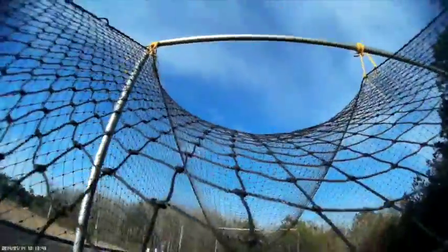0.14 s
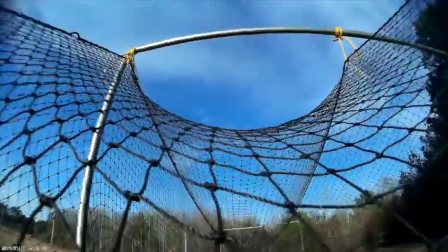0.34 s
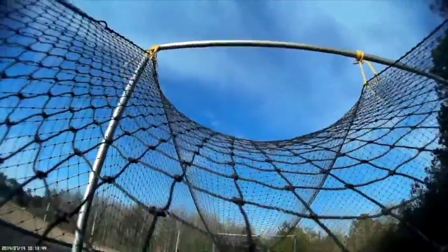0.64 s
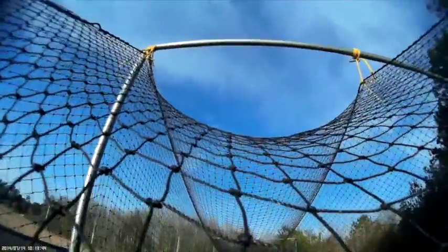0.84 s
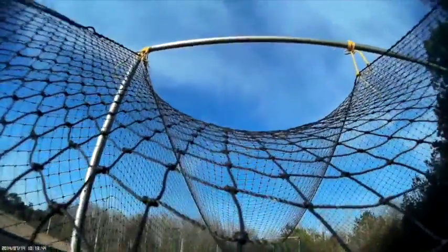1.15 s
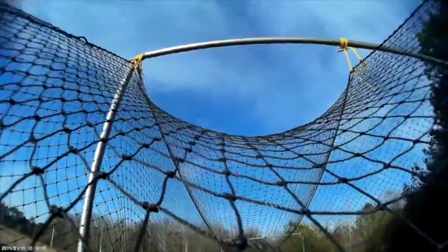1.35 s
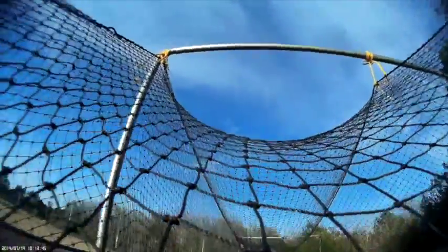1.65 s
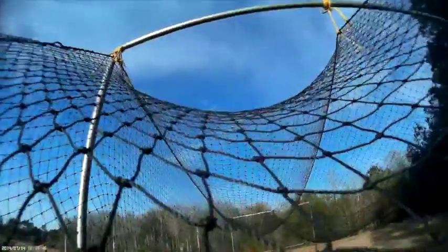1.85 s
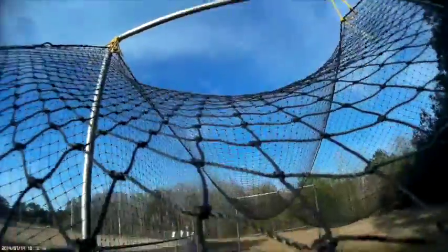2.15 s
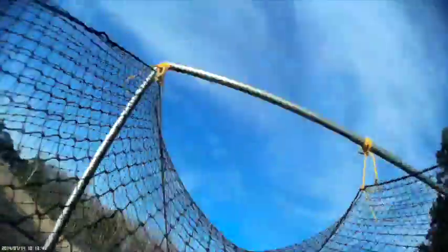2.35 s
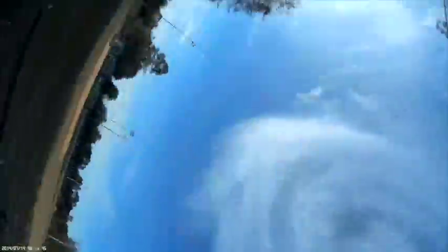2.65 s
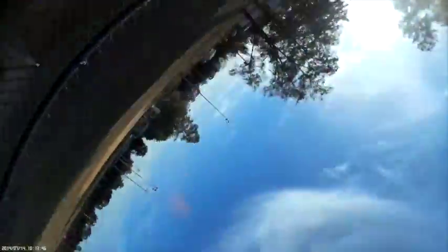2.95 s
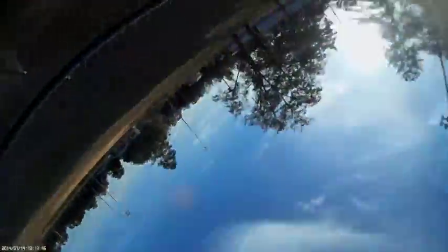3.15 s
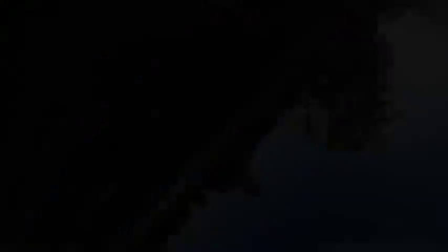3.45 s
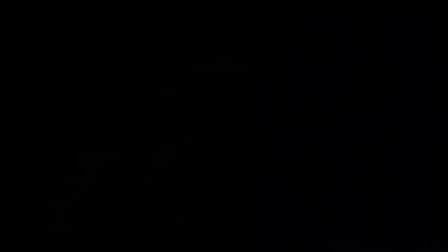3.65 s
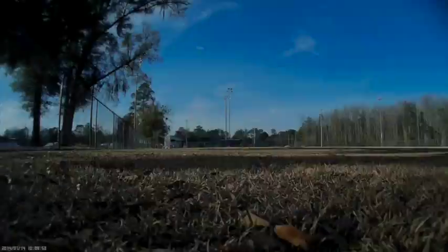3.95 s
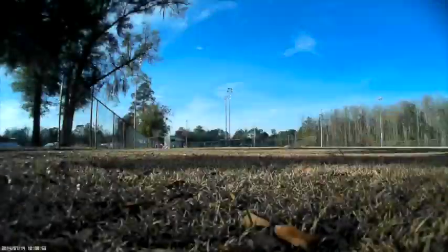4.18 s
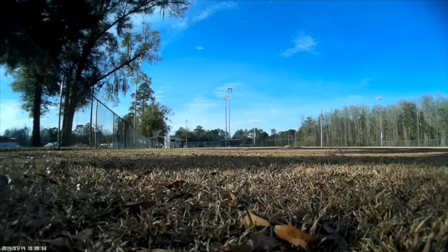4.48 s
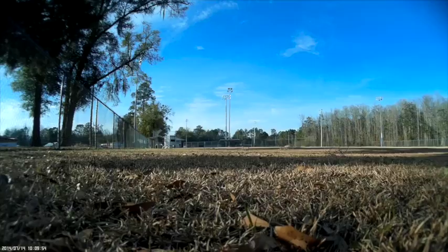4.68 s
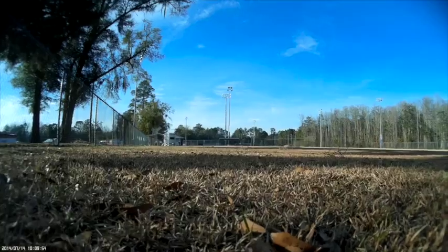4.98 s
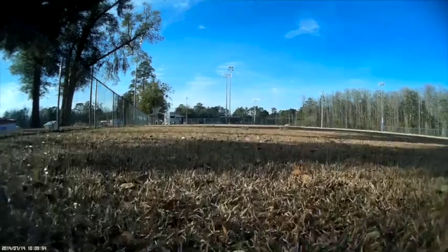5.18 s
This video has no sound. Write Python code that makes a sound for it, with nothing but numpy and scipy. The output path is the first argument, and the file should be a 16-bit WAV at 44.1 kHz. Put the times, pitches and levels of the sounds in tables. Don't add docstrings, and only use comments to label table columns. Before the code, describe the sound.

Faint rubbing and taps, rough rattling bumps on a small plastic body, quiet field with far engine, then four rotors kick and rise into a buzzing roar.

```python
import sys
import numpy as np
from scipy import signal
from scipy.fft import rfft, irfft, next_fast_len
from scipy.io import wavfile
from scipy.ndimage import uniform_filter1d, map_coordinates

SR = 44100
rng = np.random.default_rng(int(sys.argv[2]) if len(sys.argv) > 2 else 0)


def pcm_store(signal):
    levels = np.round(np.clip(np.atleast_2d(signal), -1, 1) * 32767)
    wavfile.write(sys.argv[1], SR, levels.astype(np.int16).T)


def volts_from_db(level):
    exponent = np.asarray(level, float) / 20
    return 10 ** exponent


N = 234548
T = np.arange(N) / SR

# f/Hz, width/Hz, level/dB
LID = [(1530, 70, 0), (1800, 300, -9), (2450, 250, -17)]
# f/Hz, width/Hz, level/dB
BRIGHT = [(3160, 1130, -2.5), (4045, 390, 4), (4534, 294, 3.5), (5930, 550, -0.5), (7650, 560, -9),
          (9590, 580, -10.5), (11700, 410, -20)]
# t/s, exhaust level/dB, road rumble level/dB
IDLE = [
    (3.2, -55.5, -65.5),
    (3.856, -29.5, -47),
    (4.46, -29, -45),
    (4.56, -34.5, -52.5),
]


def unit(x):
    return x / np.sqrt(np.mean(x ** 2) + 1e-20)


def mix(*levels_db):
    return np.sqrt(sum(volts_from_db(2 * np.asarray(db)) for db in levels_db))


def curves(rows, before=None):
    s, *cols = np.transpose(rows)
    return [np.interp(T, s, c, left=before) for c in cols]


def wobble(rate, size=N):
    return map_coordinates(rng.standard_normal(size=8000), [2 + np.arange(size) * rate / SR], order=2)


def filtered(x, response):
    m = next_fast_len(N + SR // 4)
    return irfft(rfft(x, m) * response(np.fft.rfftfreq(m, 1 / SR)), m)[:N]


def modes(table, f):
    total = 0
    for k, (centre, width, db) in enumerate(table):
        damping = 1j * f * width
        total = total + (-1) ** k * volts_from_db(db) * damping / (centre * centre - f * f + damping)
    return total


def rung(x, table):
    power = np.mean(abs(modes(table, np.linspace(1, SR / 2, 8192))) ** 2)
    return filtered(x, lambda f: modes(table, f) / np.sqrt(power))


def rush(spectrum):
    hz, db = np.transpose(spectrum)
    return unit(filtered(rng.standard_normal(N), lambda f: volts_from_db(np.interp(np.log(f + 1), np.log(hz), db))))


def rubbing():
    # t/s, level/dB, slip/dB
    rub = [(0, -87, 10), (.3, -69, 6.5), (.45, -63, -3), (.7, -67, -8.5), (.9, -58.5, -0.5),
           (1.1, -62.5, 1.5), (1.694, -59.5, -0.5), (1.7, -45.5, 2), (1.91, -40, -1), (2.02, -33.5, -3),
           (2.15, -40.5, 0.8), (2.35, -35, -4.5), (2.46, -48.5, 0), (2.6, -43, -0.5), (2.72, -37.5, 1.5),
           (2.86, -33, -6), (3.01, -32, -5.5), (3.12, -39.5, -9), (3.34, -54.5, 0), (3.5, -89, -5.5)]
    press_db, slip_db = curves(rub)
    part_db = np.where(T < 1.697, np.c_[[1, -4.5, -7.5]], np.c_[[0.5, -6, -12.5]])
    rub_db = press_db + part_db + np.outer([0, .4, 1], slip_db)
    grass_edge = np.minimum(T - 3.47, 3.98 - T) / 0.064
    grass_db = np.c_[[-57.5, -56.5, -66]] + 20 * np.minimum(grass_edge, 0)
    breeze_db = np.c_[[-56.5, -71.5, -90]] + curves(IDLE, before=-94.5)[1] - IDLE[-1][2]

    clumps = 2 * wobble(30) + 3.5 * wobble(100)
    smooth = np.clip(-1 - .15 * slip_db, .3, 1)
    drive = []
    for gain in mix(rub_db, grass_db):
        grit_db = smooth * (0.85 * clumps + 1.7 * wobble(40)) + 3.1 * wobble(500)
        drive.append(gain * volts_from_db(-1.5) * unit(volts_from_db(grit_db) * rng.standard_normal(N)))
    return np.array(drive) + volts_from_db(breeze_db) * rng.standard_normal((3, N))


def knocks():
    # t/s, force level/dB, place (-1 shell to 1 lid), hardness (0-1), length/ms
    sway = [(.175, -45.5, -0.42, 0.42, 26.5), (0.236, -49.5, -0.3, 0.49, 20),
            (0.346, -38.5, 0.59, 1.04, 15), (.38, -41.5, 0.27, 0.8, 23.4), (.462, -46, -1, 0.1, 22),
            (.496, -54, 0.94, 1, 12), (.514, -34, -0.51, 0.77, 19.8), (0.549, -47, -0.65, 0.3, 13.9),
            (.711, -53, 0.2, 0.9, 12.7), (.868, -47, -1, 0.5, 59), (1.48, -56.5, -0.73, 1.3, 12)]
    tug = [(1.703, -27.5, -0.13, 0.73, 8.5), (1.716, -28.5, -0.38, 0.3, 51),
           (1.761, -23, -0.37, 0.63, 13.6), (1.806, -24, 0.24, 0.99, 7.3), (1.839, -31.5, 1.3, 0.77, 32.6),
           (1.856, -28.5, 0.24, 0.51, 14), (1.904, -32.5, 0.88, 0.64, 11.3), (1.956, -41.5, 0.4, 1.28, 5.3),
           (1.999, -19, 0.047, 0.44, 10.7), (2.025, -31, -1.3, 0.57, 16), (2.073, -36, 0.029, 1.05, 16),
           (2.096, -37, 0.14, 0.84, 29.5), (2.174, -36.5, 1.2, 0.68, 11.4), (2.202, -33, 1.3, 0.21, 3.7),
           (2.216, -39, 0.83, 1.16, 13), (2.258, -33.5, -0.067, 0.67, 27), (2.308, -34.5, 0.34, .8, 6),
           (2.337, -31, 0.1, 0.46, 9.8), (2.35, -23, -0.06, 0.49, 14), (2.406, -37.5, 0.74, 1.17, 5.1),
           (2.425, -36, 0.66, 1.32, 4.9), (2.444, -35.5, 0.13, 0.88, 5.6), (2.489, -29, -0.21, 0.6, 22),
           (2.523, -40, -0.1, 0.14, 18)]
    fall = [(2.535, -46, .3, 1.05, 4), (2.552, -30.5, 0.57, 0.78, 11.6), (2.566, -9.5, 0.47, 1.136, 3.23),
            (2.581, -34, -0.015, 0.9, 2.7), (2.633, -36.5, 0.9, 0.85, 15), (2.647, -37, -0.12, 1.03, 9),
            (2.678, -26, -0.47, 0.22, 25), (2.764, -37, 0.28, 1.22, 14), (2.781, -29, 0.4, 1.03, 13.5),
            (2.822, -30, 0.14, 1.1, 9), (2.803, -18.5, -0.024, 0.78, 43.3), (2.829, -23.5, -0.13, 0.28, 13),
            (2.9, -7.5, 0.34, 0.92, 10), (3.034, -33, 0.29, .1, 29), (3.075, -27.5, 0.3, 0.6, 15.5),
            (3.088, -20, -0.46, 0.29, 10.3), (3.167, -27, 0.36, 0.47, 6.8), (3.184, -39, -0.25, 0.14, 56),
            (3.298, -45.5, -0.022, 0.62, 19)]
    settle = [(3.372, -44.5, .7, 0.13, 11), (3.428, -36.5, -0.39, 0.69, 8.6),
              (3.502, -44.5, -0.06, 1.13, 4.2), (3.522, -42, -0.085, 0.58, 23.4),
              (3.578, -48, 0.3, 1.18, 4.4), (3.605, -39, -0.14, 1.08, 6.5), (3.697, -42.5, 0.1, 0.63, 34),
              (3.766, -42.5, 0.3, 0.5, 36), (3.812, -38.5, -0.047, 1.09, 8.5),
              (3.889, -30, 0.21, 1.13, 5.7), (3.929, -56, 0.1, 0.78, 10.6), (3.984, -43, 0.73, 0.69, 21),
              (4.481, -34.5, -0.72, 1.48, 16.4), (4.486, -30, 0.43, 1.33, 13.5)]
    drive = np.zeros((4, N))
    t = T[:SR // 5]
    grit = volts_from_db(np.outer([1.7, 2.5, 5.3, 2.5], wobble(240)) - 4.0)
    for group, group_thud_db in zip((sway, tug, fall, settle), [-14, -14, -13.5, -28]):
        for s, db, place, hard, ms in group:
            shell_db = -20 * max(place, 0)
            lid_db = 20 * min(place, 0)
            bright_db = 30 * (hard - 1)
            thud_db = group_thud_db + 16 * min(hard - 1, 0)
            part_db = db + np.array([shell_db, lid_db, bright_db, thud_db])
            length = max(ms, 2) / 1000
            rise = .25 * length
            after = np.maximum(t - rise, 0) / length
            decay = volts_from_db(-np.outer([9.8, 16.3, 27.0, 5.3], after))
            shape = np.minimum(t / rise, 1) ** 2 * decay
            at = round((s - rise - .0015) * SR)
            span = slice(at, at + len(t))
            ticks = grit[:, span] ** np.clip(length / 0.013 - .5, 0, 1)
            level = volts_from_db(part_db + [2.1, 1.6, 0.2, 2.3])[:, None]
            drive[:, span] += level * shape * ticks * rng.standard_normal((4, len(t)))
    return drive


def case():
    # f/Hz, width/Hz, level/dB
    thud = [(111, 84, 0.5), (226, 36, -1), (301, 39, 2.5)]
    # f/Hz, width/Hz, level/dB
    shell = [(318.6, 20, -9), (568, 137, -12.5), (831, 82.4, -0.5), (1306, 96, -6)]
    drive = knocks()
    drive[:3] += rubbing()
    out = sum(rung(x, part) for x, part in zip(drive[1:], (LID, BRIGHT, thud)))
    for k, (hz, width, db) in enumerate(shell):
        gripped = drive[0] * volts_from_db(2 * wobble(14))
        out += (-1) ** k * volts_from_db(db - 3.5) * np.sqrt(width / 70) * rung(gripped, [(hz, width, 0)])
    return out


def blows():
    blow_s = [2.5632, 2.8975, 2.804, 2.676, 2.019, 1.758, 2.018]
    # level/dB, then modes of f/Hz, level/dB, t60/s
    blow_modes = [
        (-13, [(310, -2, 0.035), (520, -8.5, .03), (850, -15, 0.035), (1750, -3, 0.037), (2440, 1, 0.022), (3250, -11, 0.017), (3870, -10, .015), (4800, -8, .014), (5650, -0.5, 0.022), (7700, -6.5, .011)]),
        (-6, [(690, -13.5, 0.071), (835, -7.5, .06), (1500, 1, 0.038), (1880, -6, 0.017), (2470, -19.5, 0.078), (4340, -17, .02), (5200, -14.5, 0.022)]),
        (-18, [(823, -1, .07), (1476, -3.5, .05)]),
        (-26.5, [(832, -2, .08), (1550, -2, 0.054)]),
        (-19.5, [(846, -1.5, 0.06)]),
        (-38, [(2730, -1, .11)]),
        (-41, [(2730, 1, 0.12)]),
    ]
    # f/Hz, level/dB, t60/s
    buckle = [(2735, -14, 0.07), (4470, 4, 0.037), (6060, -10, 0.026)]
    # t/s, level/dB
    pings = [
        (1.758, -38),
        (2.021, -40),
        (3.074, -26),
        (3.088, -21),
        (3.426, -44),
        (3.512, -48),
    ]
    out, t = np.zeros(N), T[:SR // 8]
    rise = 1 - np.exp(-t / 0.00042)
    events = [(s, *blow) for s, blow in zip(blow_s, blow_modes)] + [(*row, buckle) for row in pings]
    for s, db, ring in events:
        tones = 0
        for hz, level_db, t60 in ring:
            tones = tones + volts_from_db(db + level_db - 60 * t / t60) * np.sin(2 * np.pi * hz * t)
        out[round(s * SR):][:len(t)] += rise * tones
    return out


def slides():
    # from t/s, to t/s, level/dB, lid share/dB
    drags = [(0.358, 0.407, -60.5, 10), (1.707, 1.742, -43, -6), (1.837, 1.87, -45.5, 1),
             (1.954, 1.975, -46, -6), (1.788, 1.828, -50, -4), (1.897, 1.943, -49, -4),
             (1.997, 2.025, -40.5, -12), (2.062, 2.106, -45, -1), (2.324, 2.37, -40.5, -1),
             (2.379, 2.431, -42.5, 1), (2.476, 2.493, -52.5, 1.5), (2.625, 2.705, -49, 2),
             (2.756, 2.875, -48, 3), (3.502, 3.53, -58.5, -3.5), (3.606, 3.639, -51.5, 3),
             (3.683, 3.724, -59, -8), (3.75, 3.834, -60.5, -6), (3.925, 3.943, -57, -6.5)]
    gains = np.zeros((2, N))
    for start, end, db, lid_db in drags:
        edge = np.clip(np.minimum(T - start, end - T) / .005, 0, 1)
        gains += np.outer(volts_from_db([db, db + lid_db]), edge)
    grain = gains * volts_from_db(3.5 * wobble(300) - 1.0) * rng.standard_normal((2, N))
    return rung(grain[0], BRIGHT) + rung(grain[1], LID)


def squeaks():
    # t/s, length/s, f/Hz, width/Hz,
    # level/dB
    rings = [(.835, 0.088, 706, 110, -47), (.9, .2, 755, 90, -59), (.84, 0.064, 960, 160, -51),
             (.93, .22, 1190, 220, -59), (.88, .45, 3800, 500, -67), (.86, .15, 5800, 600, -69),
             (1.58, 0.13, 4000, 500, -68), (.35, .15, 1540, 170, -57), (.53, 0.061, 1540, 130, -56),
             (1.758, 0.03, 2730, 12, -52), (2, 0.015, 2730, 30, -45), (2.955, 0.11, 4520, 300, -44),
             (2.958, 0.07, 3100, 200, -53), (2.92, .2, 150, 100, -48), (2.575, .15, 110, 60, -47),
             (1.5, 0.13, 95, 35, -59), (3.075, 0.03, 4400, 400, -37), (3.035, 0.012, 1250, 100, -33),
             (3.505, 0.028, 4500, 150, -51), (1.7, 0.096, 312, 27, -43.5), (3.09, .06, 312, 29, -47),
             (2.57, 0.056, 312, 35, -42),
             (1.762, .04, 1240, 40, -33), (1.81, .025, 790, 50, -34), (1.83, .06, 1510, 40, -38),
              (1.998, .018, 830, 90, -25), (2.255, .03, 1280, 60, -37), (2.35, .022, 1200, 150, -25),
              (2.372, .035, 800, 50, -38), (2.59, .15, 200, 120, -51), (2.2, .012, 2200, 300, -38),
              (2.265, .012, 4400, 150, -46), (2.79, .06, 4500, 300, -38), (2.82, .02, 2300, 500, -33),
              (2.67, .04, 1600, 300, -38), (3.61, .04, 1260, 60, -50), (3.515, .04, 990, 60, -53),
              (4.465, .045, 95, 30, -25), (.56, .07, 1570, 70, -62)]
    # length/s, f/Hz, width/Hz, level/dB
    rattle = [(0.26, 1400, 49.6, -36.5), (0.071, 970, 230, -36), (0.16, 4500, 780, -37),
              (0.15, 5950, 530, -35.5), (0.1, 830, 61, -43.5)]
    out, t = np.zeros(N), T[:SR // 2]
    for s, length, hz, width, db in rings + [(4.478, *row) for row in rattle]:
        shape = np.clip(t / (0.05 * length), 0, 1) * np.clip(1.5 - t / length, 0, 1) ** 2
        envelope = 0.35 + wobble(width, size=len(t)) + 1j * wobble(width, size=len(t))
        band = envelope * np.exp(2j * np.pi * hz * t)
        out[round(s * SR):][:len(t)] += volts_from_db(db) * shape * band.real
    return out


def blades(blade_hz, octaves, turn, half):
    # multiple of the blade rate, level/dB
    harmonics = [(1, 3), (2, -5.5), (3, -10), (4, -15), (5, -16.5), (6, -20.5), (7, -24), (8, -28),
                 (9, -32), (10, -27), (12, -26.5)]
    n = len(turn)
    low_cut_db = -10 * np.log10(1 + (131 / blade_hz) ** 8)
    thrust_db = -14 + 14.5 * octaves + low_cut_db
    tone = np.zeros(n)
    for k, db in harmonics:
        wake_db = 7.5 * (k > 1) * np.minimum(octaves, 0)
        level = volts_from_db(db + wake_db + .4 * (k - 1) * wobble(25, size=n))
        lid = 1 + 1.6 / (1 + ((k * blade_hz - 1500) / 80) ** 2)
        first = np.cos(k * (turn + half + .02 * wobble(30, size=n)))
        second = .81 * 0.71 ** (k - 1) * np.cos(k * (turn - half))
        tone += level * lid * (first + second)
    for k in range(7):
        tone += volts_from_db(-35.0 + 7.2 * wobble(21.5, size=n)) * np.cos((k + .5) * turn)
    return -volts_from_db(thrust_db - 5.0) * tone


def wash(t, octaves, turn, half):
    # level/dB at hover speed, slope/dB per octave, idle level/dB, kick level/dB
    strengths = [(-32, 8.5, -70, -42), (-26.5, 12, -39, -27), (-36, 20.5, -39.5, -37),
                 (-50, 38, -41.5, -17.5)]
    kick_t60 = [0.17, 0.26, 0.17, 0.092]
    # f/Hz, level/dB per Hz
    roar_spectrum = [(250, -39), (400, -16.5), (700, -3), (1000, -0.5), (1500, 1.5), (1800, -3),
                     (2200, -10.5), (2700, -28), (4000, -61)]
    # f/Hz, level/dB per Hz
    hiss_spectrum = [(1410, -26), (2500, -7.5), (4610, 3), (5010, -5), (5880, 0.5), (6630, -13),
                     (7300, -0.5), (8100, -17.5), (14700, -48)]
    # f/Hz, level/dB per Hz
    fizz_spectrum = [(4650, -55), (7900, -7), (8510, -25), (8930, -14.5), (10900, -20.5), (11700, -15),
                     (12700, -26), (14600, -40)]
    n = len(t)
    gains = []
    for (db, slope, idle_db, kick_db), t60 in zip(strengths, kick_t60):
        gains.append(mix(db + slope * octaves, idle_db, kick_db - 60 * (t - t[0]) / t60))
    push, roar, hiss, fizz = gains
    air = roar * volts_from_db(-2.0) * rush(roar_spectrum)[-n:]
    air += hiss * rush(hiss_spectrum)[-n:] + fizz * rush(fizz_spectrum)[-n:]
    chop = 1 - 0.25 * np.cos(turn + half)
    low = rush([(15, -3.0), (45, -2.0), (130, -8.0), (200, -9.0), (400, -19.5), (1000, -85)])[-n:]
    return air * chop * volts_from_db(0.75 * wobble(35.7, size=n)) + push * volts_from_db(4.0) * low


def windings(t, turn, half):
    # t/s, peak level/dB, width/s
    jerks = [
        (4.481, -4, 0.0011),
        (4.489, -5.5, 0.0069),
        (4.501, -12, 0.0051),
        (4.524, -11, 0.017),
        (4.572, -10.5, 0.01),
        (4.62, -15.5, 0.04),
    ]
    # offset f/Hz, level/dB
    clocks = [(-42, -9), (2, 2), (-92, -22), (25, -5)]
    # (level/dB, loudest t/s, duration/s)
    tones = [((1, 7), (-36, 4.615, .035)), ((1, 21), (-42, 4.6, .022)), ((1, 21), (-42, 4.72, .06)),
             ((1, 21), (-50, 4.95, .15)), ((1, -21), (-36, 4.562, .02)), ((1, -21), (-38, 4.655, .035)),
             ((0, 21), (-44, 4.615, .03)), ((0, 21), (-36, 4.77, .07)), ((0, 21), (-39, 5.04, .08)),
             ((2, -21), (-44, 4.665, .045)), ((0, 14), (-41, 4.7, .055)), ((0, 14), (-33, 5.15, .06)),
             ((0, 17.5), (-40, 4.75, .045)), ((1, 10.5), (-46, 4.72, .07)), ((1, 10.5), (-42, 5.15, .15)),
             ((1, -10.5), (-44, 4.665, .02)), ((1, -10.5), (-36, 5.07, .03)), ((0, 12), (-34, 5.26, .05)),
             ((2, -10.5), (-43, 5.23, .08)), ((1, 7), (-39, 4.55, .045)), ((0, 17.5), (-38, 5.15, .05)),
             ((1, 14), (-47, 5.05, .08)), ((1, 14), (-49, 4.85, .08))]
    n = len(t)
    switch = 2 * np.pi * 7576 * t
    swell = sum(volts_from_db(2 * db) * np.exp(-((t - s) / (0.48 * width)) ** 2) for s, db, width in jerks)
    whistle = np.sqrt(swell + volts_from_db(2 * -32)) * np.sin(switch + wobble(50.1, size=n))
    four = np.zeros(n)
    for hz, db in clocks:
        flutter = volts_from_db(db + 2.5 * wobble(12.0, size=n))
        four += flutter * np.sin(switch + 2 * np.pi * hz * t + 0.93 * wobble(25, size=n))
    whistle += volts_from_db(-22) * np.clip((t - 4.64) / 0.0062, 0, 1) * four
    for (carrier, order), (db, s, lasts) in tones:
        strength = volts_from_db(db + 4.1 * wobble(44, size=n)) * np.exp(-((t - s) / lasts) ** 2)
        for side in (-1, 1):
            angle = turn + side * 0.49 * half + .017 * wobble(80, size=n)
            whistle += strength * .7 * np.sin(carrier * switch + order * angle)
    return whistle


def motors():
    # t/s, blade rate f/Hz
    spin = [(4.476, 3.6), (4.6, 106), (4.65, 143.5), (4.7, 189), (4.745, 214), (4.8, 232.6), (4.87, 243.5),
            (4.95, 253.6), (5.03, 267.5), (5.11, 301.6), (5.2, 321), (5.32, 354)]
    # t/s, lag/turns
    pair_lag = [(4.66, 0), (4.745, 1), (4.87, 2.5), (4.93, 3), (5.02, 3.45), (5.125, 3.56), (5.2, 4),
                (5.245, 4.2), (5.28, 4.03)]
    start = round(spin[0][0] * SR)
    t = T[start:]
    blade_hz, lag = uniform_filter1d(curves(spin) + curves(pair_lag), size=SR // 60)[:, start:]
    octaves = np.log2(blade_hz / 250)
    turn = 2 * np.pi * np.cumsum(blade_hz) / SR
    half = np.pi * lag
    rotors = blades(blade_hz, octaves, turn, half) + wash(t, octaves, turn, half)
    return np.pad(rotors + windings(t, turn, half), (start, 0))


def engine():
    # share of the cycle, level/dB
    firings = [(0, 4), (0.359, -1), (0.691, 1.5)]
    # f/Hz, width/Hz, level/dB
    exhaust = [(51, 6.9, -10), (95.3, 12.6, 0), (119.7, 17, -9), (223.8, 14, -8.5), (394, 34, -35)]
    exhaust_db, road_db = curves(IDLE, before=-94.5)
    pulses = np.zeros(N)
    for share, db in firings:
        at = 3.095 + (np.arange(17) + share) / 8.03 + .003 * rng.standard_normal(17)
        pulses[(at * SR).astype(int)] = volts_from_db(db + rng.standard_normal(17))
    soft = np.exp(-(np.arange(-150, 150) / 35) ** 2)
    thumps = rung(np.convolve(pulses, soft, "same"), exhaust)
    thumps /= np.std(thumps[T > 3.3])
    road = rush([(25, -0.5), (60, -3.0), (130, 4.0), (250, -6), (450, -6.5), (650, -14.5),
                 (1500, -41.0), (4000, -88.5)])
    return volts_from_db(exhaust_db - 2.5) * thumps + volts_from_db(road_db + 7 + 1.2 * wobble(24)) * road


def cricket():
    # f/Hz, level/dB
    partials = [(8683, -89), (9238, -84), (9889, -81.5), (10627, -85), (11919, -87.5)]
    gate = (T > 4.09) * (T < 4.31) * (1 + 0.25 * np.sin(2 * np.pi * 62 * T))
    drift = 1.3 * wobble(150)
    return gate * sum(volts_from_db(db + 9.0) * np.sin(2 * np.pi * hz * T + drift) for hz, db in partials)


def open_air():
    # f/Hz, level/dB per Hz
    air_spectrum = [(12, -41), (20, 4), (267, -12.5), (1220, -17.5), (2940, -34.5), (3670, -32),
                    (12000, -36), (14600, -53)]
    return volts_from_db(-58.5 + 1.5 * wobble(2.2)) * rush(air_spectrum)


def scene():
    craft = case() + blows() + slides() + squeaks() + motors()
    return (craft + engine() + cricket() + open_air())[None]


def top_cut(x):
    return signal.sosfilt(signal.butter(12, 14720, fs=SR, output="sos"), x)


def record(dry):
    saturated = dry[0] / (1 + abs(dry[0] / 0.51) ** 8) ** (1 / 8)
    return top_cut(saturated)


dry = scene()
out = record(dry)
pcm_store(out)
```